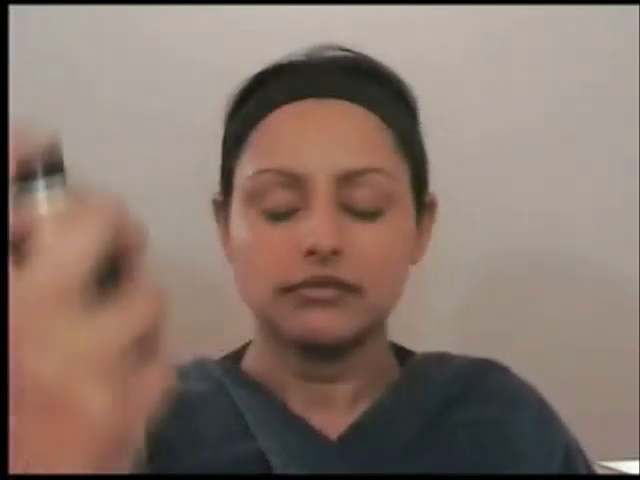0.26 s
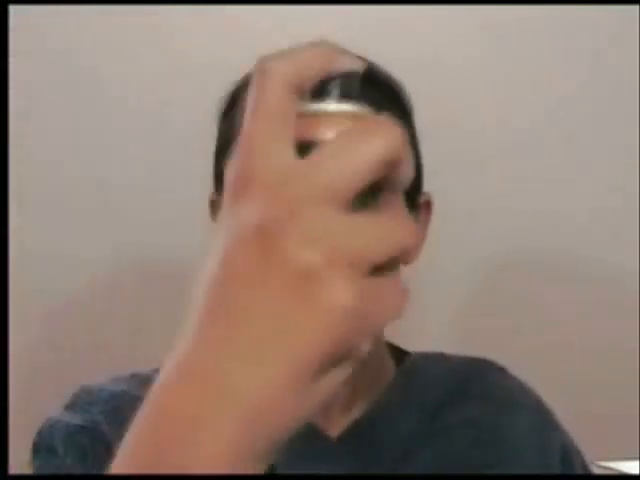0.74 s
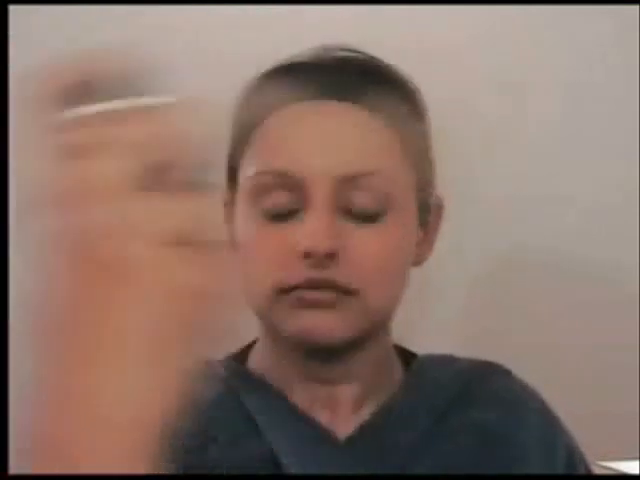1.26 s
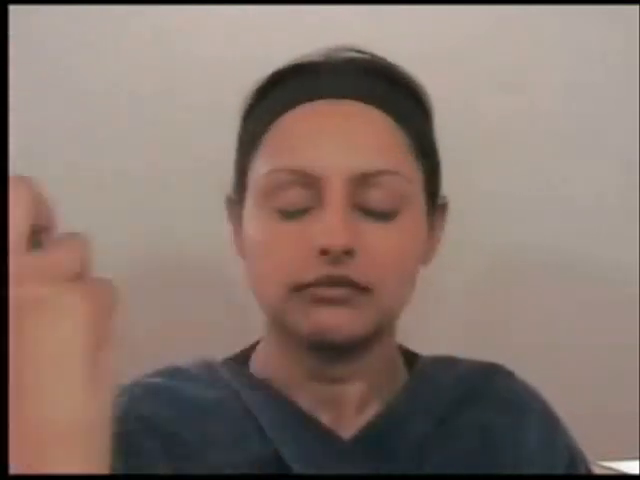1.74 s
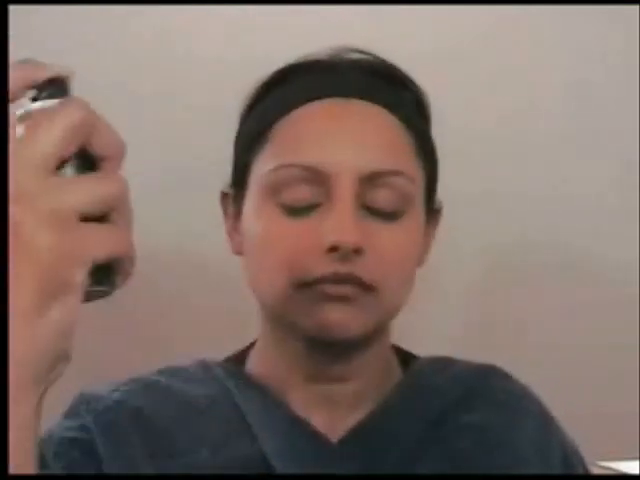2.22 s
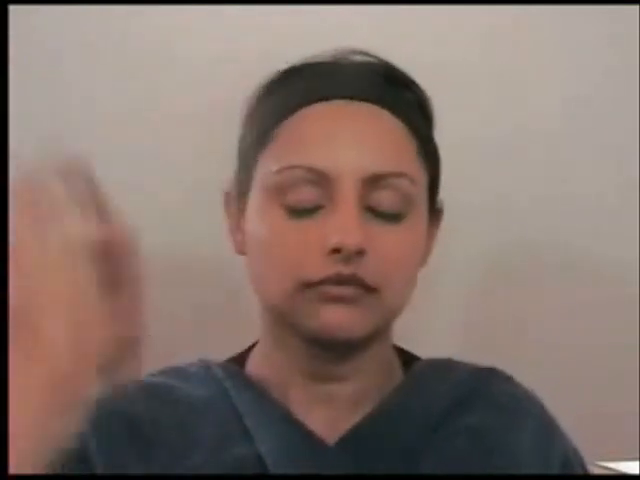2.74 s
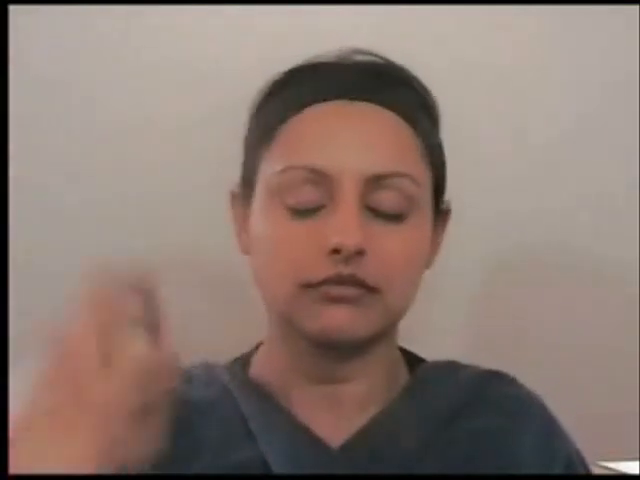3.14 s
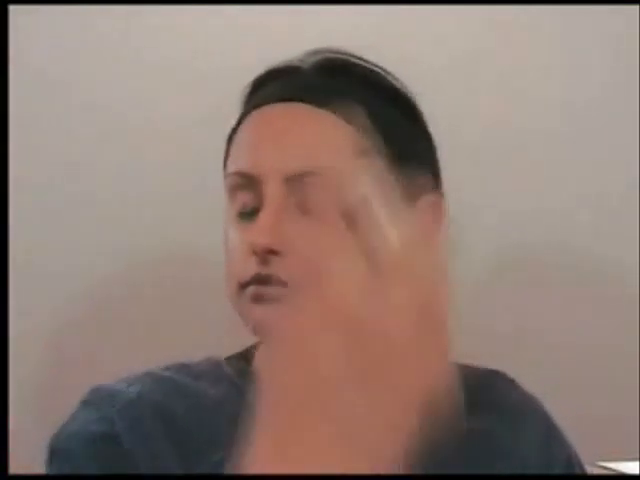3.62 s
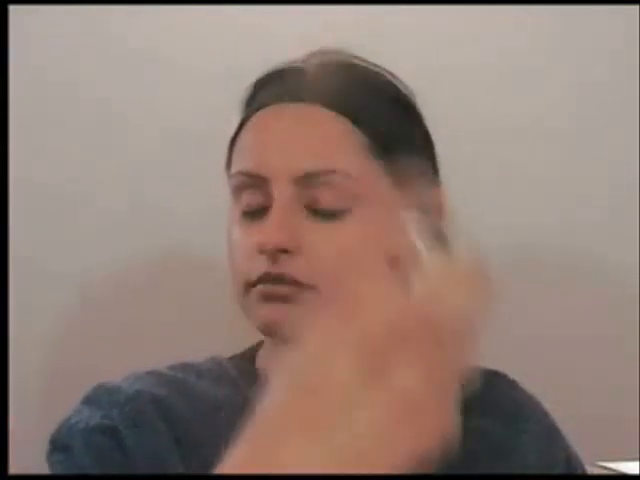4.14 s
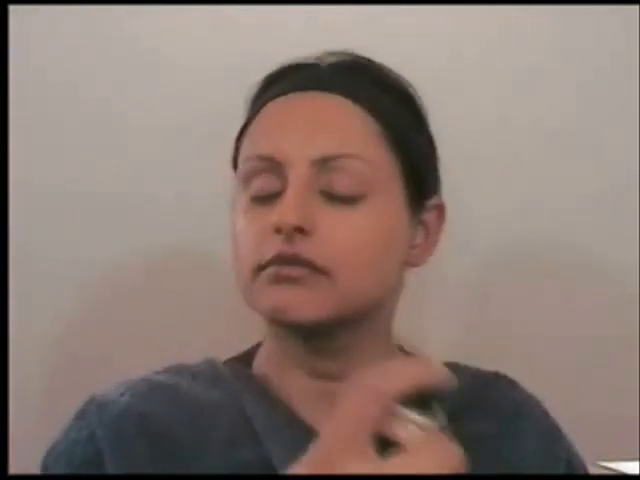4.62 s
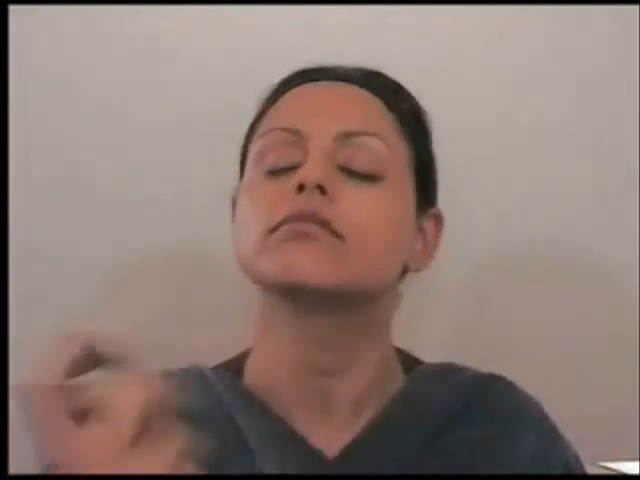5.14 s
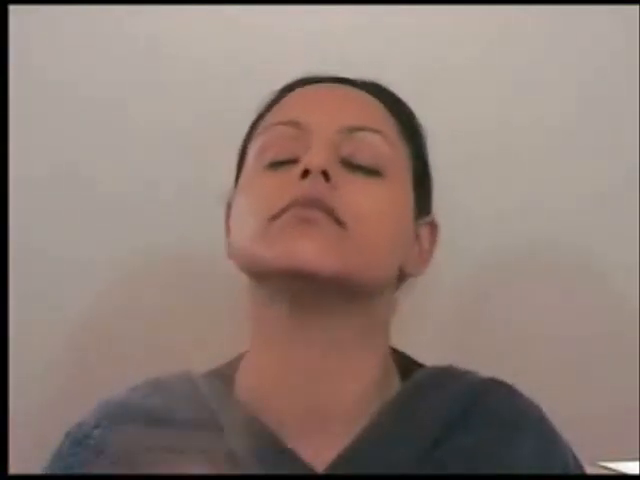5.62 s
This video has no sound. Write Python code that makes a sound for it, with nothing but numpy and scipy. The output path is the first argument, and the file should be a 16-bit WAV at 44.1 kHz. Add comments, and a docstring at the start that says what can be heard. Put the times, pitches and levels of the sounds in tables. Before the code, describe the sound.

Pressurized spray bursts sweep past close up, with a metallic rattle of the ball inside the can, over a faint electrical whine and hiss.

```python
"""Aerosol can around a face

A hand sweeps an aerosol can around a face, close to a small microphone pair in a quiet, slightly live room.
The nozzle hisses in bursts, made of coloured noise; between and during them the mixing ball knocks inside
the shaken can, each knock made of short damped rings, a snap and a room tail.
A faint electrical whine (steady harmonics) and a low hiss (soft noise) lie underneath."""
import sys
import numpy as np
from scipy import signal
from scipy.fft import rfft, irfft, next_fast_len
from scipy.io import wavfile
from scipy.ndimage import map_coordinates

SR = 44100
rng = np.random.default_rng(int(sys.argv[2]) if len(sys.argv) > 2 else 0)


def wav_record(signal):
    """Record a signal, one row per channel, as 16-bit PCM in the file named by sys.argv[1]."""
    frames = np.transpose(np.atleast_2d(signal))
    bounded = np.clip(frames, -1, 1)
    # unit amplitude maps onto the largest positive 16-bit level
    quanta = np.round(bounded * 32767).astype(np.int16)
    wavfile.write(sys.argv[1], SR, quanta)


N = 259075   # length in samples


def from_db(db):
    """Turn decibels into a gain."""
    return 10 ** (np.asarray(db) / 20)


def rms_one(x):
    """Scale a sound to rms 1."""
    return x / np.sqrt(np.mean(x ** 2) + 1e-20)


def energy_one(x):
    """Scale a short sound to unit energy."""
    return rms_one(x) / np.sqrt(x.shape[-1])


def at_hz(points, hz):
    """Read a table of levels between its points, along a log-frequency axis."""
    points = np.array(points)
    return np.interp(np.log(hz), np.log(points[:, 0]), points[:, 1])


def drift(rate):
    """A smooth random wander of spread about 1, with about `rate` turns a second."""
    t = np.arange(N) / SR * rate
    turns = rng.standard_normal(int(t[-1]) + 3)
    return map_coordinates(turns, [t], order=2, mode="nearest")


def noise(spectrum, size):
    """Noise of a given colour, falling away steeply past the ends of its spectrum; rms 1."""
    length = next_fast_len(size, True)
    hz = np.maximum(np.fft.rfftfreq(length, 1 / SR), 1)
    low_end = 1 + (spectrum[0][0] / hz) ** 8
    high_end = 1 + (hz / spectrum[-1][0]) ** 16
    colour = from_db(at_hz(spectrum, hz)) / np.sqrt(low_end * high_end)
    white = rfft(rng.standard_normal(length))
    return rms_one(irfft(white * colour)[:size])


def add(out, s, sound):
    """Mix a sound in at time s."""
    start = int(round(s * SR))
    out[start:start + len(sound)] += sound[:N - start]


def swells(rows):
    """A gain that rises and falls smoothly around each row's middle."""
    t = np.arange(N) / SR
    return sum(from_db(db) * np.exp(-((t - middle_s) / half_s) ** 2) for middle_s, half_s, db in rows)


EASE_S = 0.03   # hand and finger move smoothly: sets how round the corners are


def plateau(start_s, end_s, rise_db_per_s, fall_db_per_s):
    """An envelope in dB: a rise, a hold at 0 from start to end, a fall; with rounded corners."""
    t = np.arange(N) / SR
    early = np.hypot(np.maximum(start_s - t, 0), EASE_S) - EASE_S
    late = np.hypot(np.maximum(t - end_s, 0), EASE_S) - EASE_S
    return -rise_db_per_s * early - fall_db_per_s * late


def side_of(x, width, response):
    """The left-right difference made from x: a response, scaled by a width table."""
    hz = np.maximum(np.fft.rfftfreq(N, 1 / SR), 1)
    side = irfft(rfft(x) * response * from_db(at_hz(width, hz)), N)
    return side * [[1], [-1]]   # added on the left, taken away on the right


# colour of the background hiss: pitch_hz, relative level_db (per Hz)
HISS_COLOUR = [(30, -9.5), (55, -2), (80, -8), (120, -21.5), (180, -10), (260, -24), (450, -15),
               (800, -19.5), (1500, -20.5), (2600, -18.5), (4000, -21.5), (5600, -16.5), (9000, -24),
               (13000, -30)]
# how much the hiss differs between left and right: pitch_hz, relative side level_db
HISS_WIDTH = [(40, -13), (300, -14.5), (640, -32), (1400, -24.5), (3100, -7), (6800, -6), (14000, 6)]
HISS_DB = -54.5   # rms of the part both microphones share


def hiss():
    """The noise floor: nearly the same on left and right around 640 Hz, somewhat wide in the bass, widest on
    top."""
    shared = noise(HISS_COLOUR, N)
    difference = side_of(noise(HISS_COLOUR, N), HISS_WIDTH, 0.91)
    return from_db(HISS_DB) * (shared + difference)


# electrical whine: harmonic number (times the fundamental), relative level_db
WHINE_HARMONICS = [(2, -64.5), (3, -70), (4, -71.5), (6, -54.5), (7, -69), (11, -69), (12, -58.5),
                   (13, -58), (14, -65.5), (15, -64.5), (18, -69.5), (19, -64), (20, -63), (21, -72),
                   (23, -80), (24, -75), (30, -91), (34, -66)]
WHINE_HZ = 299.95   # the fundamental


def whine(level_db, waver_db):
    """Steady harmonics of one low pitch that waver a little in strength."""
    t = np.arange(N) / SR
    lines = np.zeros(N)
    for harmonic, db in WHINE_HARMONICS:
        strength = from_db(db + waver_db * drift(15))
        lines += strength * np.sin(2 * np.pi * (harmonic * WHINE_HZ * t + rng.random()))
    return np.sqrt(2) * from_db(level_db) * lines   # root 2 turns rms into peak


# the ball rolls briefly along the wall as the can tips: middle_s, half_length_s, level_db
ROLLS = [(2.455, 0.011, -50.5), (2.597, 0.043, -53), (3.615, 0.04, -42.5), (3.99, 0.018, -56),
         (4.778, 0.017, -41)]
# colour of the can's ring in the room, also heard after each knock: pitch_hz, relative level_db (per Hz)
CAN_TAIL = [(300, -31.5), (900, -17), (1500, -7), (2300, -2), (2750, 2.5), (3000, 4.5), (3300, -1.5),
            (4300, -3), (5800, -4), (7000, -11.5), (8500, -12)]


def rolling(grain_db):
    """A rolling ball keeps the can ringing softly and unevenly."""
    return swells(ROLLS) * from_db(grain_db * drift(250)) * noise(CAN_TAIL, N)


def strike(modes, pitch_hz, focus_db, scatter_db):
    """One contact rings damped modes, those near its pitch favoured; unit energy."""
    hz, level_db, decay_60db_s = np.transpose(modes)
    t = np.arange(int(SR / 50)) / SR
    distance_octaves = np.log2(hz / pitch_hz)
    chance_db = scatter_db * rng.standard_normal(len(hz))
    gains = from_db(level_db - focus_db * distance_octaves ** 2 + chance_db)
    phase = rng.uniform(-0.84, 1, (len(hz), 1))
    fading = np.exp(-np.log(1000) * t / decay_60db_s[:, None])
    rings = np.sin(2 * np.pi * hz[:, None] * t + phase) * fading
    return energy_one(gains @ rings * (1 - np.exp(-t / 0.00037)))   # the start is softened


def crack(pitch_hz, low_ratio, high_ratio, decay_s):
    """The first instant of a contact is a broad snap of noise around its pitch; unit energy."""
    t = np.arange(int(SR / 50)) / SR
    snap = rng.standard_normal(len(t)) * np.exp(-t / decay_s)
    band = signal.butter(3, [low_ratio * pitch_hz, high_ratio * pitch_hz], "band", fs=SR, output="sos")
    return energy_one(signal.sosfilt(band, snap))


def room_tail(spectrum, decay_60db_s, first_echo_s, early_db):
    """The room's answer: slightly weaker scatter from hand and face, then the walls, dying away; unit energy."""
    t = np.arange(SR // 2) / SR
    arrival = np.where(t < first_echo_s, from_db(early_db), 1)
    fading = np.exp(-np.log(1000) * t / decay_60db_s)
    return energy_one(noise(spectrum, len(t)) * arrival * fading)


# ball against the can: start_s, relative level_db, pitch_hz, relative bright_db (its tick), relative tail_db
KNOCKS = [(1.085, -35.5, 2830, -24, -5.5), (1.921, -15.5, 3040, -9.5, -12.5),
          (1.954, -19.5, 2380, -22, -19.5), (1.997, -29, 2370, -28, -17), (2.0324, -21.5, 2850, -17, -12),
          (2.0644, -13.5, 3470, -7.5, -12), (2.6367, -19.5, 3080, -3, -10.5), (2.9427, -27, 2550, -7, -16),
          (2.9598, -23.5, 3040, 4.5, -7.5), (3.3557, -20, 2730, -2.5, -12), (3.396, -32, 3080, -13, -12.5),
          (3.5733, -40, 2800, 0.5, -11), (3.626, -36.5, 2880, -20, -10), (3.8981, -20, 2630, -18.5, -20),
          (3.971, -34, 2230, -26, -25), (4.0134, -18.5, 3330, -0.5, -9.5),
          (4.3008, -22.5, 3330, -1.5, -15.5), (4.3357, -24.5, 3630, -8, -10.5),
          (4.655, -23, 3340, -13, -17), (4.7132, -18.5, 2900, 0.5, -11), (4.7265, -15.5, 2800, -6, -19),
          (4.752, -24, 2960, 1.5, -15), (4.8144, -24.5, 3340, -13, -13), (4.8633, -30.5, 3240, -6, -13),
          (5.1017, -17.5, 2900, -19, -17.5), (5.1179, -27, 2950, -25, -11), (5.172, -31.5, 2910, 2.5, -3.5),
          (5.3377, -19.5, 2580, -15, -15), (5.361, -24, 2430, -18, -9), (5.484, -18, 3070, -3.5, -8.5),
          (5.6341, -17, 2500, -9, -10), (5.7046, -24.5, 3640, -5, -11), (5.7318, -24.5, 3120, 1.5, -5.5)]
# rings of the can, damped by the hand and the liquid: pitch_hz, relative level_db, decay_60db_s
CAN_MODES = [(1400, 2, 0.0047), (2250, 2.5, 0.0056), (2800, 5.5, 0.0038), (4110, 4, 0.0034),
             (5330, -16, 0.0018)]
# a sharp contact also rings the top of the can: pitch_hz, relative level_db, decay_60db_s
TICK_MODES = [(8100, 4.5, 0.0031), (9340, 14, 0.0018), (10370, 7, 0.0025)]
# colour of the tick's ring in the room: pitch_hz, relative level_db (per Hz)
BRIGHT_TAIL = [(4000, -27), (6500, -1.5), (8500, 4.5), (10500, 5), (12500, 3.5), (14000, -41)]
ROOM_DECAY_60DB_S, BRIGHT_DECAY_60DB_S = 0.31, 0.29
THUD_DB = -41                  # relative thud through the hand in every knock
JOLT_S, JOLT_DB = 2.0644, -20   # the hardest shake jolts the whole can: a heavy thud (relative level)


def mixing_ball(knock_db, crack_db, tick_db, thud_db, room_db, bright_room_db, tilt_db):
    """Each hit of the ball: a knock with a snap, a bright tick, a thud through the hand, and room tails."""
    out = np.zeros(N)
    t = np.arange(int(SR / 50)) / SR
    thud_shape = np.exp(-t / 0.00018) * (1 - np.exp(-t / 0.00017))
    thud = energy_one(np.cos(2 * np.pi * 250 * t) * thud_shape)
    for start_s, level_db, pitch_hz, bright_db, tail_db in KNOCKS:
        hit = from_db(knock_db) * strike(CAN_MODES, pitch_hz, focus_db=9.0, scatter_db=1.2)
        hit += from_db(crack_db) * crack(pitch_hz, low_ratio=0.55, high_ratio=1.67, decay_s=0.00039)
        hit += from_db(tick_db + bright_db) * strike(TICK_MODES, 9300, focus_db=3.0, scatter_db=2.0)
        hit += from_db(thud_db + THUD_DB) * thud
        # a higher knock tilts its tail towards the treble, a lower one towards the bass
        tilt = tilt_db * np.log2(pitch_hz / 3000)
        colour = [(hz, db + tilt * np.log2(hz / pitch_hz)) for hz, db in CAN_TAIL]
        tail = from_db(room_db) * room_tail(colour, ROOM_DECAY_60DB_S, first_echo_s=0.0019, early_db=-1)
        bright = room_tail(BRIGHT_TAIL, BRIGHT_DECAY_60DB_S, first_echo_s=0.004, early_db=-0.5)
        tail += from_db(bright_room_db + bright_db) * bright
        add(out, start_s, from_db(level_db) * hit)
        add(out, start_s, from_db(level_db + tail_db) * tail)
    add(out, JOLT_S, from_db(thud_db + JOLT_DB) * thud)
    return out


# the valve is held open; aimed away, the jet is only a faint hiss: open_s, shut_s, relative level_db
PRESSES = [(0.0, .39, -51), (0.795, 1.9, -53), (2.658, 3.33, -45.5), (3.946, 4.523, -53),
           (5.066, 5.87, -52)]
OPEN_DB_PER_S, SHUT_DB_PER_S = 450, 165
AWAY_MIST_DB = 0   # relative mist while aimed away
# the hand swings the jet across the face: arrive_s, leave_s, relative roar_db,
# then mist_db and rush_db, both counted from the roar
SWEEPS = [(0.0, .165, -31, -5.5, -18), (1.159, 1.815, -33.2, -5.5, -15), (2.807, 3.263, -32.5, -2, -13.5),
          (4.065, 4.182, -32, -2.5, -14), (4.41, 4.458, -31, -1.5, -18), (5.161, 5.78, -35.7, -3.5, -18)]
ARRIVE_DB_PER_S, LEAVE_DB_PER_S = 273, 244
# the core of the jet brushes the microphones: middle_s, half_length_s, relative level_db
PUFFS = [(1.235, 0.091, -51), (1.68, 0.074, -55.5), (2.99, 0.086, -53), (3.24, 0.077, -62),
         (4.13, 0.093, -54.5), (4.4, 0.038, -48.5), (5.7, 0.08, -51)]
CORE_ROAR_DB, CORE_MIST_DB, CORE_RUSH_DB = 16, 17, 7   # relative levels the core adds to each layer


def burst_levels():
    """Gains of roar, mist and rush: faint aimed away, loud in each sweep, bright and windy in the jet's core."""
    away = np.zeros(N)
    for open_s, shut_s, level_db in PRESSES:
        away += from_db(level_db + plateau(open_s, shut_s, OPEN_DB_PER_S, SHUT_DB_PER_S))
    core = swells(PUFFS)
    # hypot adds the layers by power
    roar = np.hypot(away, core * from_db(CORE_ROAR_DB))
    mist = np.hypot(away * from_db(AWAY_MIST_DB), core * from_db(CORE_MIST_DB))
    rush = core * from_db(CORE_RUSH_DB)
    for arrive_s, leave_s, roar_db, mist_db, rush_db in SWEEPS:
        db = roar_db + plateau(arrive_s, leave_s, ARRIVE_DB_PER_S, LEAVE_DB_PER_S)
        roar = np.hypot(roar, from_db(db))
        mist = np.hypot(mist, from_db(db + mist_db))
        rush = np.hypot(rush, from_db(db + rush_db))
    return roar, mist, rush


# colours of the spray's layers, each: pitch_hz, relative level_db (per Hz)
ROAR_COLOUR = [(530, -57), (900, -13.5), (1100, -10), (1320, -3.5), (1430, -5), (1700, 0), (1830, -3.5),
               (1950, -0.5), (2780, 0.5), (3140, -2), (4330, -0.5), (5960, -7), (7500, -8), (9750, -34),
               (16500, -120)]   # the mid roar of the jet
MIST_COLOUR = [(4120, -35), (7000, -12), (8240, -4.5), (12500, 1), (13700, -2), (15500, -9)]   # the hiss of droplets
RUSH_COLOUR = [(32, -38), (55, -7), (86, -17), (172, -8), (251, -9), (356, 3.5), (433, -3.5), (572, 3),
               (638, -2), (775, 0.5), (1000, -1.5), (1300, -5.5), (2200, -120)]   # the lumpy low rush of air
PUFF_COLOUR = [(65, -2.5), (100, -10), (170, -2.5), (300, -5)]   # the deep wind of the core on the microphones
CAN_RING = [(2300, -10), (2700, 5.5), (3200, -27)]   # the flow through the valve keeps the can ringing


def spray(roar_db, mist_db, rush_db, sputter_db, gust_db):
    """A turbulent jet: a mid roar, the hiss of atomising droplets and a lumpy low rush; it sputters slightly."""
    roar, mist, rush = burst_levels()
    ring = from_db(-12 + 5.1 * drift(6.93)) * noise(CAN_RING, N)   # comes and goes as the can turns
    jet = roar * from_db(roar_db) * (noise(ROAR_COLOUR, N) + ring)
    jet += mist * from_db(mist_db) * noise(MIST_COLOUR, N)
    air = rush * from_db(rush_db) * noise(RUSH_COLOUR, N)
    air += swells(PUFFS) * noise(PUFF_COLOUR, N)
    sputter = from_db(sputter_db * drift(250))
    gusts = from_db(gust_db * drift(40))
    return jet * sputter + air * gusts


# how much the can, whine and spray differ between left and right: pitch_hz, relative side level_db
WIDTH = [(60, -20), (160, -53), (450, -54), (1200, -75), (1900, -32.5), (2700, -8.5), (4400, -8.5),
         (8000, -7), (12500, -1)]


def microphone_pair(x, scatter_s, shifted_share):
    """Two close microphones differ by a fixed phase-shifted part and by a short scatter of near reflections."""
    t = np.arange(SR // 10) / SR
    scatter = rfft(energy_one(rng.standard_normal(len(t)) * np.exp(-t / scatter_s)), N)
    shifted = np.clip(shifted_share, 0, 1)
    # 1j shifts the phase by a quarter turn
    return x + side_of(x, WIDTH, 1j * np.sqrt(shifted) + np.sqrt(1 - shifted) * scatter)


def scene():
    """Spray and rattle over the background; a phase-shifted difference and a separate swirl widen the jet."""
    jet, swirl = [spray(roar_db=0.47, mist_db=2.5, rush_db=1.0, sputter_db=1.09, gust_db=2.0)
                  for layer in range(2)]
    wide_jet = jet + side_of(jet, WIDTH, 1j * from_db(-15.0))
    wide_jet += side_of(swirl, WIDTH, from_db(-5.0))
    rattle = mixing_ball(knock_db=19.5, crack_db=19.0, tick_db=20.5, thud_db=13.0,
                         room_db=33.0, bright_room_db=29, tilt_db=9)
    can_and_whine = rattle + rolling(grain_db=3.0) + whine(level_db=-0.5, waver_db=1.1)
    return wide_jet + microphone_pair(can_and_whine, scatter_s=0.0088, shifted_share=0.44) + hiss()


CUTOFF_HZ = 15300


def record(dry):
    """The loudest peaks are rounded, and the top is cut steeply."""
    rounded = 1.3 * np.tanh(dry / 1.3)
    steep_cut = signal.ellip(10, .2, 80, CUTOFF_HZ, fs=SR, output="sos")
    return signal.sosfilt(steep_cut, rounded)


dry = scene()
out = record(dry)
wav_record(out)
```